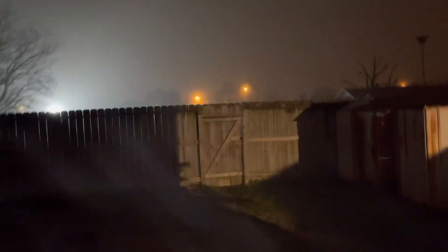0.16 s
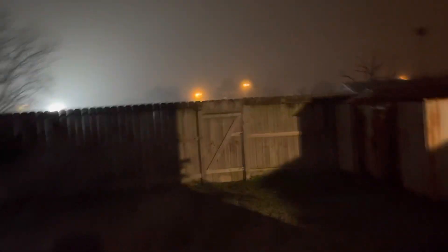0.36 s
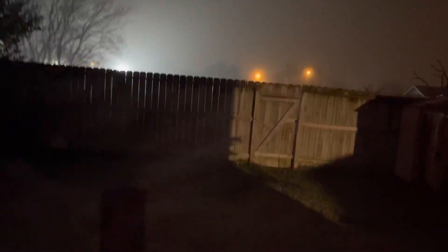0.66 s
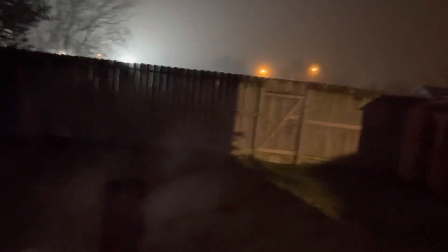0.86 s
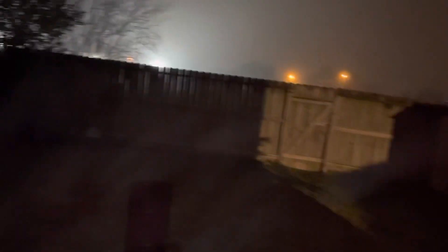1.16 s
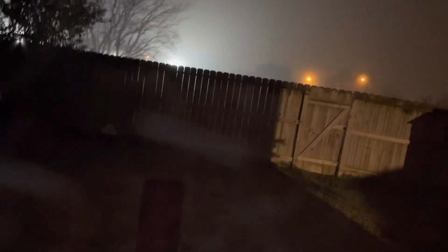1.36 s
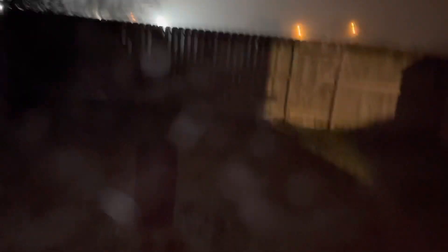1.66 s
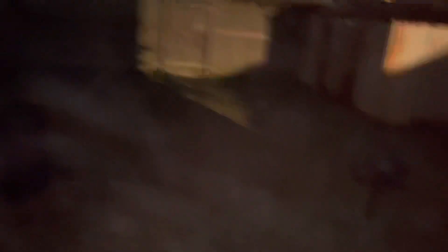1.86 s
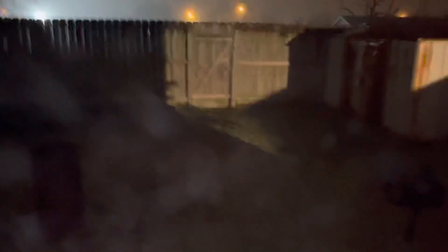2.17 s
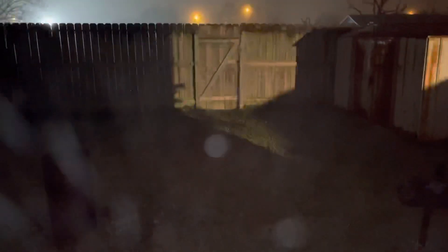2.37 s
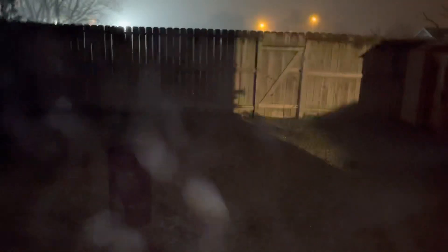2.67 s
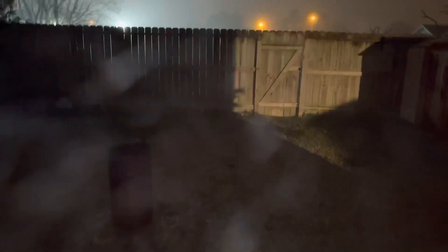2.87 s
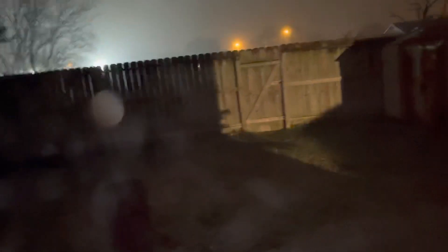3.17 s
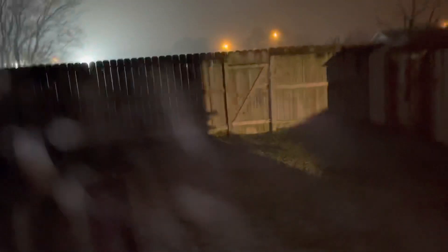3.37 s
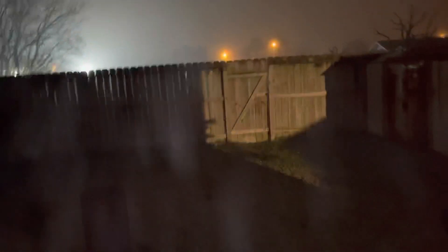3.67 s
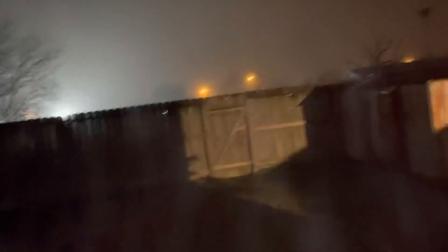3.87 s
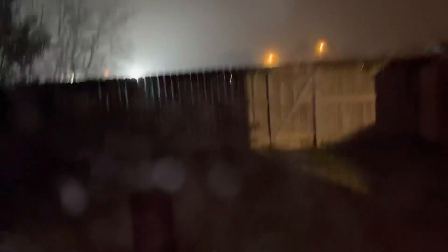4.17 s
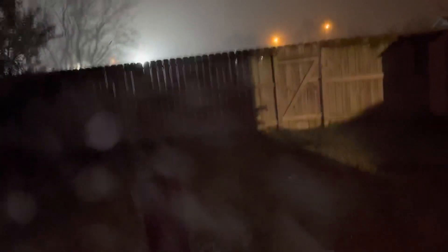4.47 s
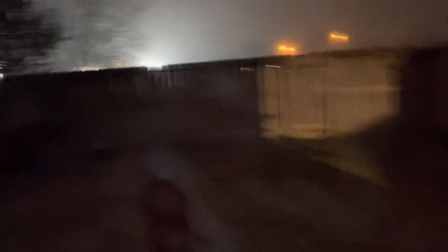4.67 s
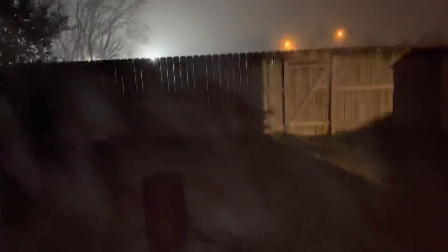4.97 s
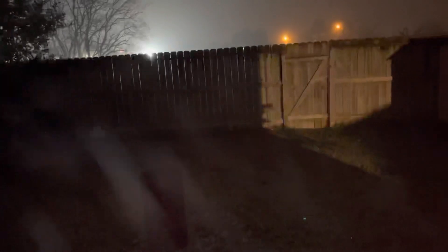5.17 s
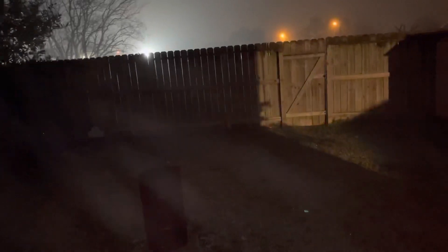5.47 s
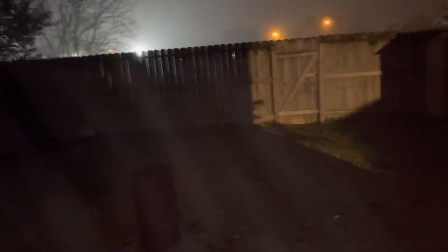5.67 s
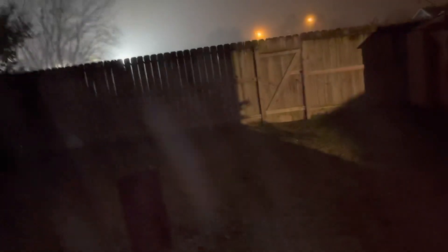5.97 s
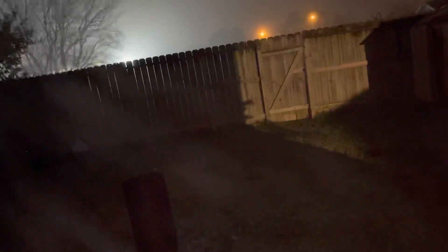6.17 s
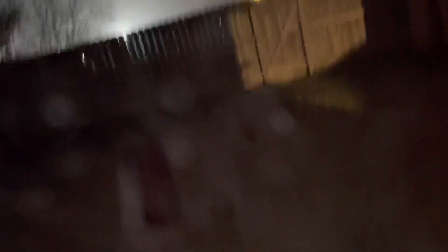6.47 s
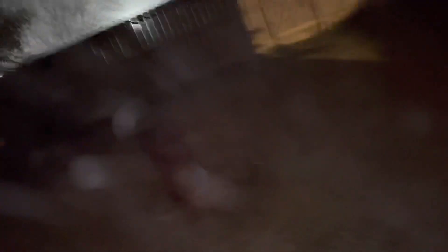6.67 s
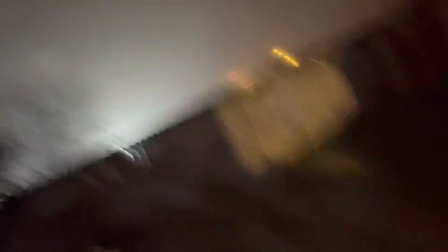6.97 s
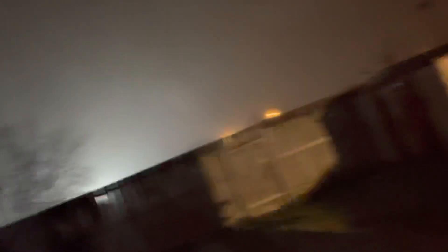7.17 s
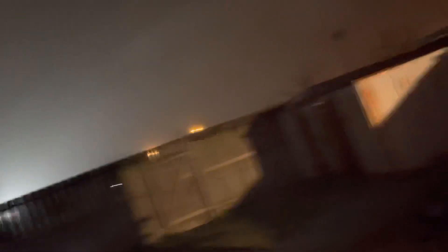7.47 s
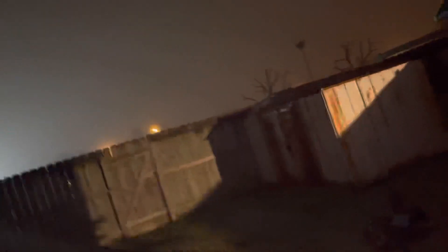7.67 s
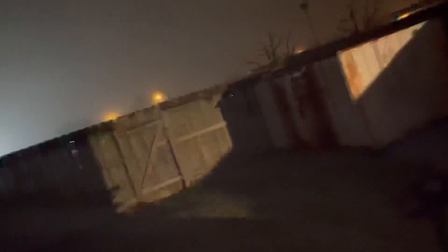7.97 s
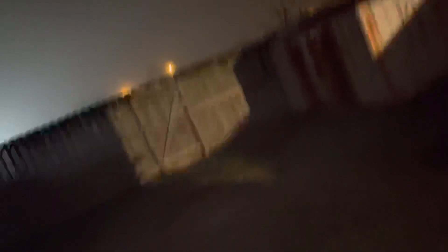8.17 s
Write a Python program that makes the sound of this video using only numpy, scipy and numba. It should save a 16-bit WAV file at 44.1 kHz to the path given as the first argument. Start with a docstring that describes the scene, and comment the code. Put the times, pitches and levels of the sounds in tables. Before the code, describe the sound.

In a backyard at night, a gas torch hisses in three bursts, its igniter snaps, a fuse sputters and pops, and a shell clunks into a hollow tube.

```python
"""Back yard at night: a hand-held gas torch is opened three times and hisses as turbulent gas rings nozzle and barrel.
Its knob ticks and its igniter snaps twice, short blows on decaying modes; the flame catches and roars, low noise.
A fuse flares up, pops and fizzes on as sparking noise, and the shell drops into a hollow tube and rings its air column.
Distant traffic rumbles under a faint hiss, filtered noise, with one droning engine, a sine of wandering pitch.
A phone with two microphone ports is held close."""
import sys
import numpy as np
from scipy import signal
from scipy.fft import rfft, irfft, next_fast_len
from scipy.io import wavfile
from scipy.ndimage import uniform_filter1d
from numba import njit

SR = 44100
rng = np.random.default_rng(int(sys.argv[2]) if len(sys.argv) > 2 else 0)


def convert_level_to_amplitude(level_db):
    """Map a level in decibels to its linear amplitude factor."""
    exponent = np.asarray(level_db, float) / 20
    return 10 ** exponent


def store_wav(level_fs):
    """Save 16-bit WAV to argv[1]."""
    pcm = np.round(np.clip(np.atleast_2d(level_fs), -1, 1) * 32767)
    wavfile.write(sys.argv[1], SR, pcm.T.astype(np.int16))


N = 367055
T = np.arange(N) / SR  # s
F = np.fft.rfftfreq(N, 1 / SR) + 1  # Hz, raised by 1 so that its logarithm exists

# openings of the gas valve: opens_s, shuts_s, flow_db
VALVE = [(0.722, 2.018, -0.5), (2.638, 3.839, 0), (4.077, 6.694, 0)]
# the gas cloud catches, one thump: start_s, level_db, pitch_hz, t60_s
CATCH = (4.307, -28, 105, .09)
# burning fuse: time_s, fizz_db, brightness_db as the sparks face the phone
FUSE_BURN = [(5.95, -56, -1), (6.066, -54, -3), (6.085, -42, -8), (6.2, -41, -3.5), (6.286, -38.5, 1),
             (6.31, -38, 2), (6.35, -35, 3.5), (6.41, -31.5, -2), (6.576, -28, -1.5), (6.65, -27.5, 3.5),
             (6.728, -28, -5.5), (6.774, -27.5, -6), (6.84, -36, -3.5), (7.146, -38.5, -3),
             (7.25, -39, 0.5), (7.37, -36, -4), (7.44, -40.5, -5.5), (7.544, -44, 4), (7.66, -42.5, 0.5),
             (7.71, -42, 1), (7.866, -38, -6.5), (8.184, -43.5, 2), (8.33, -43.5, -2.5)]


def curve(rows, off=-120):
    """Linear interpolation of a table's columns over time; the first column is `off` outside the table."""
    s, first, *rest = np.transpose(rows)
    return [np.interp(T, s, first, off, off)] + [np.interp(T, s, column) for column in rest]


def over_hz(points):
    """Interpolation of a (Hz, value) table on a logarithmic frequency axis, at every bin."""
    hz, value = np.transpose(points)
    return np.interp(np.log(F), np.log(hz), value)


def unit(x):
    """Normalisation to an rms of 1."""
    return x / np.sqrt(np.mean(x ** 2))


def noise(colour):
    """Spectral shaping: white noise weighted by a (Hz, dB) spectrum, rms 1."""
    white = rfft(rng.standard_normal(N))
    return unit(irfft(white * convert_level_to_amplitude(over_hz(colour)), N))


def walk(rate_hz):
    """Slow random modulation: levels held 1 / rate_hz and smoothed twice, rms 1."""
    hold = int(SR / rate_hz)
    steps = np.repeat(rng.standard_normal(N // hold + 1), hold)
    return unit(uniform_filter1d(uniform_filter1d(steps, hold), hold)[:N])


@njit
def moving_bandpass(x, centre_hz, width_hz):
    """State-variable resonator whose centre may move, with gain 1 at the centre."""
    y, band, low = np.empty(len(x)), 0., 0.
    for i in range(len(x)):
        g, k = np.tan(np.pi * centre_hz[i] / SR), width_hz / centre_hz[i]
        v = (band + g * (x[i] - low)) / (1 + g * (g + k))
        band, low, y[i] = 2 * v - band, low + 2 * g * v, k * v
    return y


def resonant(source, pitch_hz, modes, first_db=0., second_db=0.):
    """Excited resonances in fixed ratio to one moving pitch; the first two may swell and fade."""
    bands = []
    for ratio, width_hz, db in modes:
        centre_hz = np.clip(ratio * pitch_hz, 100, .4 * SR)
        once = moving_bandpass(source, centre_hz, 1. * width_hz)
        twice = moving_bandpass(once, centre_hz, 1. * width_hz)  # steeper skirts
        bands.append(convert_level_to_amplitude(db) * unit(twice))
    moved = sum(bands[2:]) + convert_level_to_amplitude(first_db) * bands[0] + convert_level_to_amplitude(second_db) * bands[1]
    return moved / np.sqrt(np.mean(sum(bands) ** 2))


def ports(make, alike, lead_s=0., turn=0., pan_db=0.):
    """Partial coherence: left hears one draw; right a phase-shifted copy blended with a second draw."""
    one, other = rfft(make()), rfft(make())
    # above 9 kHz the right port always leads by 0.2947 ms and is inverted
    phase = np.where(F > 9000, np.pi + 2 * np.pi * F * 0.0002947, turn + 2 * np.pi * F * lead_s)
    c = np.clip(alike, -1, 1)
    right = c * one * np.exp(1j * phase) + np.sqrt(1 - c ** 2) * other
    return irfft(np.array([one * convert_level_to_amplitude(pan_db / 2), right * convert_level_to_amplitude(-pan_db / 2)]), N)


def patchy(x, patchy_db, width_hz, hold_s):
    """Random modulation: patches of the time-frequency plane swell and fade on their own."""
    f, t, z = signal.stft(x, SR, nperseg=512)
    field = rng.standard_normal(z.shape[-2:])
    for size, axis in ((width_hz / f[1], 0), (hold_s / (t[1] - t[0]), 1)):
        length = int(size) + 1
        field = uniform_filter1d(uniform_filter1d(field, length, axis), length, axis)
    return signal.istft(z * convert_level_to_amplitude(patchy_db * unit(field)), SR, nperseg=512)[1][..., :N]


def sounding(start_s, grows_s, stop_s, dies_db_per_s):
    """Exponential onset and decay: gain grows from a start, holds, and dies away after a stop."""
    onset = 1 - np.exp(-np.clip(T - start_s, 0, None) / grows_s)
    return onset * convert_level_to_amplitude(-dies_db_per_s * np.clip(T - stop_s, 0, None))


def strike(out, s, db, modes, push_s, pan_db=0., lead_s=.00038, sign=-1, tail_db=-18, rough=1,
           rise_s=.00001, sharp=0.):
    """Modal excitation: a push, rough or smooth, rings (Hz, dB, t60 s) modes; the right port gets it earlier."""
    t = np.arange(int(.25 * SR)) / SR
    decay = np.exp(-t / push_s) + convert_level_to_amplitude(tail_db) * np.exp(-t / (5 * push_s))
    shape = (1 - np.exp(-t / 0.00054)) * decay
    ring = sum(convert_level_to_amplitude(g) * np.sin(2 * np.pi * f * t) * np.exp(-np.log(1000) * t / t60) for f, g, t60 in modes)
    ring = ring * (1 - np.exp(-t / rise_s))
    # small parts radiate nothing far below their lowest mode
    highpass = signal.butter(3, 0.81 * modes[0][0], "high", fs=SR, output="sos")
    ring = signal.sosfilt(highpass, ring)
    both, own = (1 - rough + rough * rng.standard_normal((2, len(t)))) * shape
    both[int(.0004 * SR)] += sharp  # the sharp contact comes as the push builds up
    for side, push in enumerate((both, sign * both + .6 * rough * own)):
        piece = signal.fftconvolve(ring, push)[:len(t)]
        start = int((s - side * lead_s) * SR)
        peak = convert_level_to_amplitude(db + (1.0 - side) * pan_db)  # pan_db changes the left port only
        out[side, start:start + len(t)] += piece / np.abs(piece).max() * peak


def torch_gas():
    """Turbulent excitation of resonators: gas rings the nozzle (jet) and, lower down, the barrel; both flutter."""
    # nozzle resonances, width of each of two filters in series: pitch_ratio, width_hz, level_db
    jet_modes = [(1.002, 1250, 4.5), (1.1, 1320, 2.5), (1.328, 3700, 2), (1.3, 3000, 0.5), (0.866, 950, -8)]
    # barrel resonances, likewise: pitch_ratio, width_hz, level_db
    barrel_modes = [(0.965, 1270, 4), (0.623, 1020, -1.5), (0.8, 460, -5), (1.17, 930, -2),
                    (0.38, 2250, -11.5), (0.21, 2200, -9.5)]
    # the hand turns the nozzle: time_s, gain_db of the jet as it points at the phone
    aim_rows = [(0.78, 0.5), (1.75, -6.5), (1.86, -2), (2.02, -2.5), (2.69, -1), (3.0, 2), (3.24, -6),
                (3.5, 3), (3.65, 1), (3.8, 5.5), (3.86, 3.5), (4.13, 4), (4.34, -2), (4.51, 3), (4.95, 2.5),
                (5.65, 6), (6.3, 6), (6.55, 8.5), (6.7, 10.5)]
    # the grip on the barrel shifts: time_s, pitch_hz, second_resonance_db
    grip = [(0.72, 7370, 5.5), (1.0, 7200, -0.5), (1.72, 7220, -2), (1.8, 7300, 2.5), (1.9, 7570, 2),
            (2.1, 7600, 1.5), (2.64, 6970, -4), (3.0, 7000, -1), (3.8, 6950, -0.5), (4.3, 7160, -0.5),
            (4.6, 7000, -2), (5.3, 6700, -5.5), (5.7, 7160, -0.5), (6.1, 7900, 1), (6.7, 7900, -6)]
    # likeness of the ports for the gas: frequency_hz, coherence (-1 opposite to 1 alike)
    gas_alike = [(1500, -0.43), (2200, 0.99), (2900, 0.85), (3300, -0.37), (3900, 0.93), (4600, .7),
                 (5300, -0.076), (5900, 0.25), (7000, 0.99), (7800, 0.49), (8900, -0.18), (9500, 0.94),
                 (16000, 1)]
    jet_db, barrel_db, seep_db = -42, -51, -77.5
    opens_s, jet_dies_db_per_s, barrel_dies_db_per_s = 0.029, 346, 247
    wander = 0.012  # rms, as a fraction of the jet's pitch

    aim_db = np.interp(T, *np.transpose(aim_rows))
    jet_hz = (10270 + 47 * aim_db) * (1 + wander * walk(4.76))  # side-on the jet is duller
    barrel_hz, second_db = curve(grip, 7000)
    barrel_hz = barrel_hz * (1 + wander / 2 * walk(6.4))
    lit_db = -6.5 * (T > CATCH[0])  # burning gas rings the barrel's main resonance less
    flutter = convert_level_to_amplitude(0.24 * walk(400) + 0.92 * walk(60))

    def flow(dies):
        """Superposed valve openings as one gain."""
        return sum(convert_level_to_amplitude(db) * sounding(a, opens_s, b, dies) for a, b, db in VALVE)

    def jet_draw():
        """Noise-driven nozzle resonance."""
        return resonant(flutter * rng.standard_normal(N), jet_hz, jet_modes)

    def barrel_draw():
        """Noise-driven barrel resonance."""
        return resonant(flutter * rng.standard_normal(N), barrel_hz, barrel_modes, lit_db, second_db)

    jet = patchy(ports(jet_draw, over_hz(gas_alike)), 2.2, 300, 0.11)
    jet = jet * convert_level_to_amplitude(jet_db + aim_db) * flow(jet_dies_db_per_s)
    barrel = patchy(ports(barrel_draw, over_hz(gas_alike)), 2.94, 300, 0.13)
    # side-on the barrel is louder
    barrel = barrel * convert_level_to_amplitude(barrel_db - 0.25 * aim_db) * flow(barrel_dies_db_per_s)
    # gas creeps past the valve seat before it first opens
    seep = ports(lambda: noise([(3000, -26.0), (5300, -1), (7500, -23.0), (12000, -48.5)]), 0.31)
    seep = seep * convert_level_to_amplitude(seep_db) * sounding(0.38, 0.05, VALVE[0][0], jet_dies_db_per_s)
    return jet + barrel + seep


def flame():
    """Turbulent combustion: a low roar, inverted and stronger in the right port; the flaring fuse feeds it."""
    # spectrum of the roar: frequency_hz, level_db
    roar_colour = [(40, -37), (120, -1.5), (330, 4.5), (500, -7.5), (900, -10.5), (1500, -26),
                   (3000, -29.5), (8000, -121)]
    flame_db, fed_db = -39.5, -8.5  # fed_db: roar the flaring powder adds, against its fizz
    grows_s, dies_db_per_s = 0.041, 89
    lick = convert_level_to_amplitude(flame_db) + convert_level_to_amplitude(curve(FUSE_BURN)[0] + fed_db)
    lick = lick * sounding(CATCH[0], grows_s, VALVE[-1][1], dies_db_per_s)
    lick = lick * convert_level_to_amplitude(.8 * walk(60))
    return lick * ports(lambda: noise(roar_colour), 0.92, lead_s=0.00013, turn=np.pi, pan_db=-5.5)


def fuse():
    """Random impulsive emission: powder spits noise in puffs and sparks; the left port's lows lag variably."""
    # spectrum of the fizz: frequency_hz, level_db
    fizz_colour = [(60, -5), (200, -6), (400, -5), (1000, -2), (2000, -2.5), (3000, -9), (4200, -10.5),
                   (6000, -10.5), (8500, -6), (11300, -4), (12900, -14), (14500, -45)]
    # likeness of the ports for the fuse: frequency_hz, coherence (-1 opposite to 1 alike)
    fizz_alike = [(200, 0.74), (1500, 0.8), (3000, 0.24), (4200, 0.82), (6000, 0.25), (8300, 0.61),
                  (10000, 1), (16000, 0.5)]
    # the hand shades the right port: frequency_hz, left_minus_right_db
    shade = [(200, -7), (900, -4.5), (2200, 1.5), (4000, 3), (6000, 4), (9000, -0.5), (16000, 1.5)]
    # the fuse moves around the phone: time_s, left_lag_ms, left_turn_rad
    path = [(6.07, 0.19, 2.5), (6.35, 0.06, 3.5), (6.47, 1.02, 0.5), (6.7, 1.19, 1.4), (6.8, 1.01, 1.3),
            (7.1, 0.66, 0.6), (7.3, 0.815, 2.54), (8.0, .85, 1), (8.12, 0.67, 1.4), (8.22, .3, 1.1),
            (8.33, 0.0049, 0)]
    db, bright_db = curve(FUSE_BURN)
    spit = convert_level_to_amplitude(db + 1.8 * walk(350) + .8 * walk(90) + .5 * walk(25))
    sparks = 1 + (rng.random(N) < 300 / SR) * 0.8 * rng.exponential(size=N)  # about 300 a second
    pair = ports(lambda: noise(fizz_colour) * sparks, over_hz(fizz_alike), pan_db=over_hz(shade))
    pair = patchy(patchy(pair, 2.2, 500, .12), 1.6, 900, .025)
    low, below = (signal.sosfiltfilt(signal.butter(2, hz, fs=SR, output="sos"), pair) for hz in (2700, 5700))
    # the middle takes only a share of the brightness, the top all of it
    middle = (below - low) * convert_level_to_amplitude(3.5 + 0.57 * bright_db)
    top = (pair - below) * convert_level_to_amplitude(bright_db)
    s, lag_ms, turn_rad = np.transpose(path)
    analytic = signal.hilbert(low[0], next_fast_len(N))[:N]
    turned = np.real(analytic * np.exp(1j * np.interp(T, s, turn_rad)))
    low = np.array([np.interp(T - np.interp(T, s, lag_ms) / 1000, T, turned), low[1]])
    # a jet of sparks briefly lifts the fizz around 4250 Hz
    flare = convert_level_to_amplitude(9) * np.exp(-((T - 6.722) / 0.035) ** 2)
    narrow = np.array([moving_bandpass(np.ascontiguousarray(ear), np.full(N, 4250.), 1100.) for ear in pair])
    return spit * (flare * narrow + low + middle + top)


def igniter_snaps(out):
    """Impact on a stiff body: each snap rings high modes and a crack; a rebound and echoes slap back."""
    # igniter snaps: start_s, level_db, crack_db against the snap
    snaps = [(3.2218, -5.5, -3), (4.3042, -6, -3)]
    # modes of the igniter: frequency_hz, level_db, t60_s
    snap_modes = [(320, 0, 0.0068), (1800, -15.5, 0.015), (3136, 3.5, 0.013), (5250, 1.5, 0.014),
                  (5720, -6.5, 0.0058), (8160, 2.5, 0.005), (9450, -1.5, 0.0048), (11550, -6, 0.0073)]
    # the hammer's rebound and echoes slapping back: delay_s after the snap, level_db against it
    slaps = [(.008, -15.5), (.019, -36), (0.0492, -24), (.062, -33), (.112, -30)]
    for s, db, crack_db in snaps:
        strike(out, s, db + 0.5, snap_modes[1:], .0007, pan_db=8.0, tail_db=-9.0, sharp=6)
        # fences scatter it back
        scatter = [(3700, -2.0, 0.00058), (8000, -8.0, 0.00043)]
        strike(out, s + 0.0041, db - 26.5, scatter, .045, tail_db=-46.0)
        strike(out, s + 0.0023, db - 21.5, snap_modes[:1], .0003, rough=0, sign=1)
        strike(out, s, db + crack_db, [(7470, 0, 0.00042)], .0012)
        for late_s, late_db in slaps:
            strike(out, s + late_s, db + late_db, snap_modes[2:6], .002)


def flame_catch(out):
    """Sudden expansion of the igniting gas cloud: one smooth push on a low, heavily damped mode."""
    s, db, hz, t60 = CATCH
    strike(out, s, db, [(hz, 0, t60)], .001, -9.0, rough=0, sign=1)


def fuse_pops(out):
    """Impulsive bursts of powder: short rough pushes on three damped modes."""
    # pops of the fuse: start_s, peak_db, treble_db
    pops = [(6.655, -13, -5.5), (7.1025, -43, -1)]
    for s, db, treble_db in pops:
        modes = [(2000, 0.013, 0.0074), (4140, treble_db - 0.5, 0.0065), (7900, treble_db, 0.013)]
        strike(out, s, db, modes, .001, sign=0.53)


def shell_drop(out):
    """Air-column resonance: the shell and its bounces ring the tube, each with a hard knock on top."""
    # the shell lands and bounces: start_s, level_db, knock_db against the ring
    drops = [(7.266, -6.5, -4), (7.299, -26, -4), (7.325, -26, -3), (7.349, -22, -8)]
    # modes of the tube: frequency_hz, level_db, t60_s
    tube = [(167, -3.5, 0.042), (289, -3.5, 0.051), (447, 6, 0.056), (573, -3, 0.07), (744, 5.5, 0.045),
            (1000, 3, 0.024), (1400, -5, 0.044), (2330, -26, .04), (4300, -23, 0.035)]
    knock = [(hz, 0, .003) for hz, _, _ in tube[4:]] + [(5900, 7.8, 0.0013), (10000, 16.0, 0.0009)]
    for s, db, knock_db in drops:
        # the air column builds up
        strike(out, s, db, tube, .0002, -3.5, lead_s=0.00044, sign=0.55, rough=0, rise_s=0.0028)
        strike(out, s, db + knock_db, knock, .0015)


def knob_ticks(out):
    """Contact of small solid parts: knob and fingers ring short modes in fixed ratio to each tick's pitch."""
    # ticks, beginning 0.38 ms after the time given: time_s, level_db, pitch_hz, upper_modes_db
    ticks = [(0.017, -73, 2100, -6), (0.0689, -36, 2950, -18), (0.204, -61, 2100, -20),
             (0.211, -51, 1900, -5), (0.221, -64, 2000, 0), (0.246, -43, 1550, -18),
             (0.2464, -38.5, 2550, -20), (0.2684, -52, 1300, -11), (0.306, -66, 2600, 4),
             (1.93, -45, 1800, -8), (2.06, -40, 1840, -10), (2.118, -36, 1920, -3), (2.178, -38, 1770, -3),
             (2.183, -38, 1860, -8), (2.2079, -57, 1660, -6), (2.2794, -67, 1900, -10),
             (2.326, -68, 1700, -18), (2.4173, -43, 1570, -14), (2.503, -62, 1700, -14),
             (2.511, -47.5, 1700, -15), (2.522, -51, 2000, -16), (2.563, -62, 1600, -8),
             (3.7919, -16, 1780, 3.5), (3.7935, -15, 3120, -10), (3.981, -41.5, 1826, -4),
             (3.9896, -40.5, 1700, -16), (3.996, -61, 1800, 11), (4.0096, -28.5, 2110, -28)]
    # modes of a tick: pitch_ratio, level_db, t60_s
    tick_modes = [(.85, -6, .004), (1.0, 0, .006), (1.25, -12, .003), (1.5, -9, .003), (2.4, -3, .004),
                  (3.0, -6, .003), (4.6, -12, .002), (6.2, -14, .002)]
    for s, db, hz, upper_db in ticks:
        modes = [(ratio * hz, g + (ratio > 2) * upper_db, t60) for ratio, g, t60 in tick_modes]
        strike(out, s + 0.00038, db, modes, .0009, -1.5, lead_s=.00013, sign=0.75, rise_s=0.00016,
               tail_db=-20, sharp=3.3)
        # fences scatter it back
        strike(out, s + 0.0039, db - 33.5, [(hz, 0, .002), (1.54 * hz, -4, .002)], .04, tail_db=-38)


def finger_tap(out):
    """Soft impact: a finger taps the phone, a smooth push on one damped mode."""
    # taps: start_s, peak_db, pitch_hz, t60_s
    taps = [(3.361, -43, 480, 0.02)]
    for s, db, hz, t60 in taps:
        strike(out, s, db, [(hz, 0, t60)], .0008, rough=0, sign=1)


def knocks():
    """Linear superposition of all the short blows."""
    out = np.zeros((2, N))
    for blows in (igniter_snaps, flame_catch, fuse_pops, shell_drop, knob_ticks, finger_tap):
        blows(out)
    return out


def town():
    """Diffuse far field: swelling traffic bass, nearly alike in both ports, steady noise above it and a drone."""
    # spectrum of the background, traffic bass and faint microphone hiss: frequency_hz, level_db
    colour = [(22, 0.5), (60, 3), (146, -8.5), (271, -23.5), (400, -25.5), (1100, -36), (3000, -52.5),
              (6000, -67), (9000, -60), (10200, -82), (11400, -59.5), (13000, -85)]
    # likeness of the ports for the background: frequency_hz, coherence
    alike = [(60, 0.97), (130, 0.98), (300, 1), (650, 0.55), (1500, 0.5), (12000, .5)]
    # phase of the right port: frequency_hz, turn_rad
    port_turn = [(130, 0), (300, -1.06), (1500, -1.4)]
    # swell of the bass: time_s, gain_db
    swell = [(0, -45.5), (4.2, -47), (5.0, -42.5), (6.0, -42), (6.5, -43), (7.0, -46), (8.33, -46.5)]
    # far engine: time_s, level_db, pitch_hz
    engine = [(3.3, -59, 62.4), (3.65, -42, 61.56), (4.4, -56, 59.66), (4.9, -57, 59.2), (5.5, -52, 59.5),
              (5.8, -56, 68.66), (6.8, -51, 70.4)]
    pair = ports(lambda: noise(colour), over_hz(alike), turn=over_hz(port_turn))
    bass = signal.sosfiltfilt(signal.butter(2, 130, fs=SR, output="sos"), pair)
    steady = patchy(pair - bass, 0.98, 300, 0.13) * convert_level_to_amplitude(-42.0)
    drone_db, drone_hz = curve(engine)
    drone_phase = 2 * np.pi * np.cumsum(drone_hz + 1.393 * walk(6.5)) / SR
    drone = convert_level_to_amplitude(drone_db + 2.0 * walk(12)) * np.sin(drone_phase) * np.sqrt(2)
    return bass * convert_level_to_amplitude(curve(swell)[0]) + steady + drone


def scene():
    """Linear superposition of all sources at the two ports."""
    return torch_gas() + flame() + fuse() + knocks() + town()


def roll_off(x):
    """The treble ends steeply here."""
    return signal.sosfilt(signal.butter(12, 16850, fs=SR, output="sos"), x)


def record(dry):
    """Port response and saturation: a slight lift near 11 kHz, lost extremes and rounded peaks."""
    # response of the ports: frequency_hz, gain_db
    port_colour = [(15, -57), (26, -26), (45, 1), (9000, -1), (11300, 1), (12600, -2), (13800, -9.5),
                   (15500, -19), (16200, -45.5), (22000, -74)]
    half = 4096  # samples on each side of the response's centre
    response = np.roll(irfft(convert_level_to_amplitude(over_hz(port_colour)), N), half)[None, :2 * half + 1]
    padded = np.pad(dry, ((0, 0), (half, half)), "reflect")
    coloured = signal.fftconvolve(padded, response, "valid", axes=1)
    rounded = .85 * np.tanh(coloured / .85)
    return roll_off(rounded)


dry = scene()
out = record(dry)
store_wav(out)
```